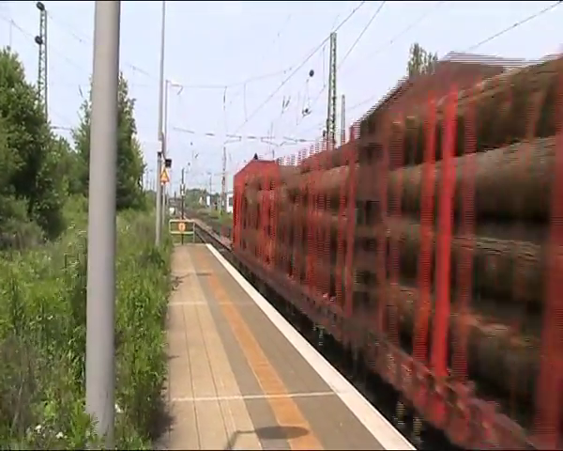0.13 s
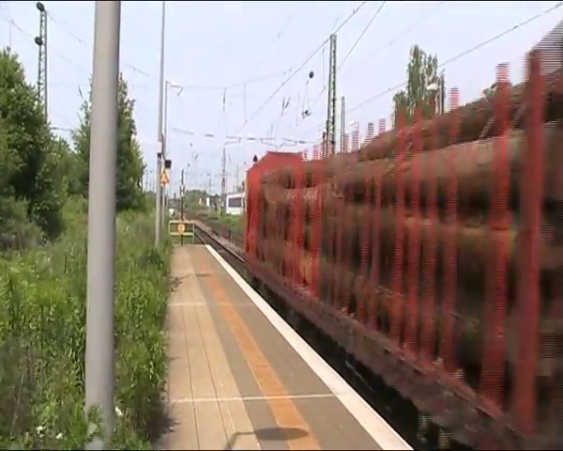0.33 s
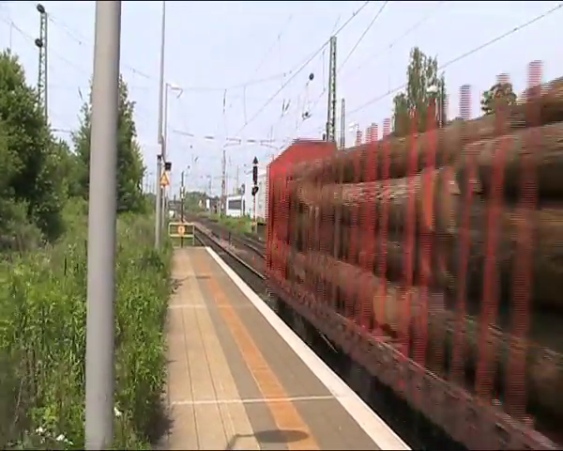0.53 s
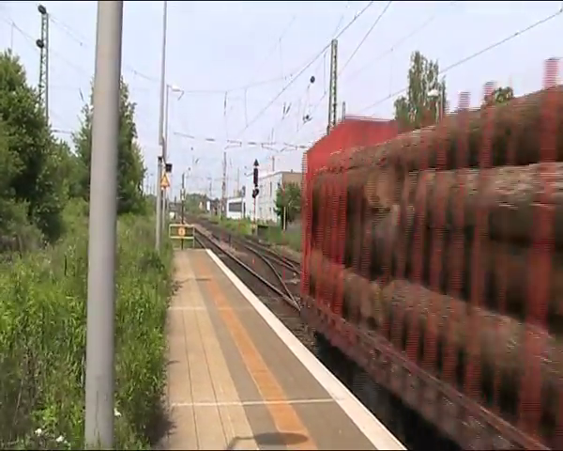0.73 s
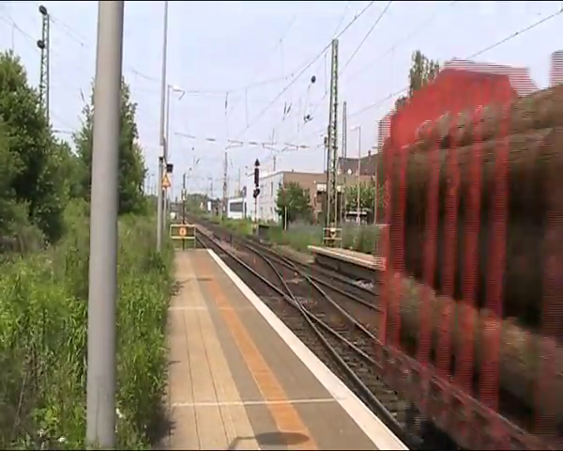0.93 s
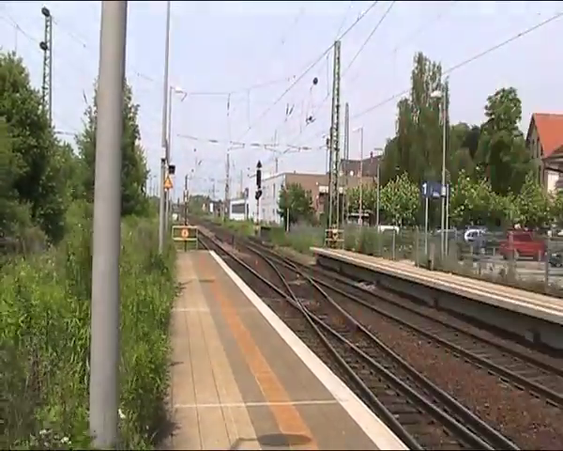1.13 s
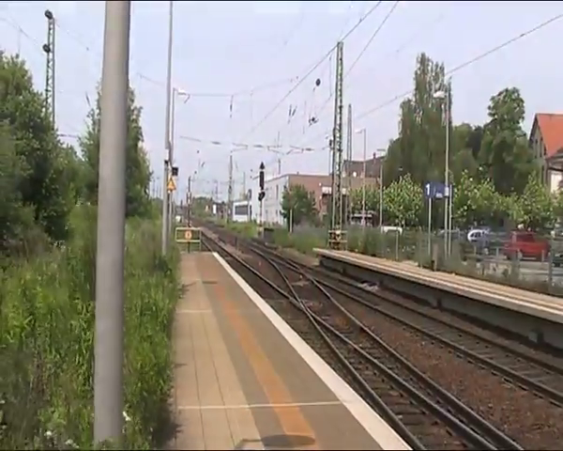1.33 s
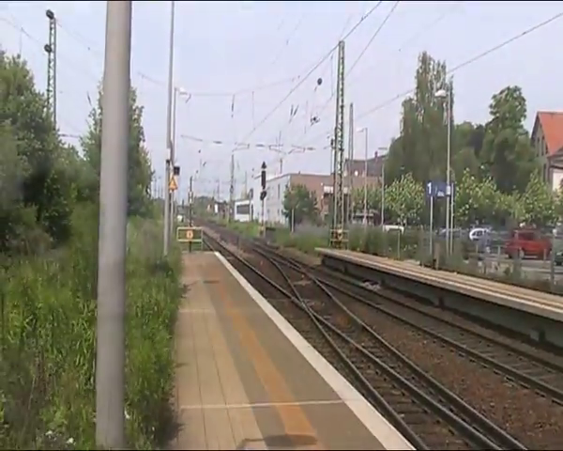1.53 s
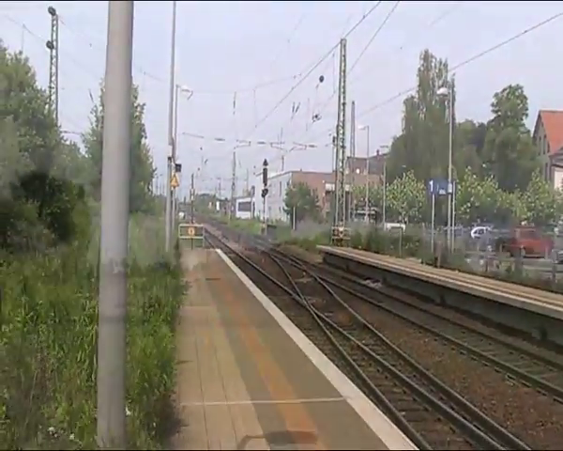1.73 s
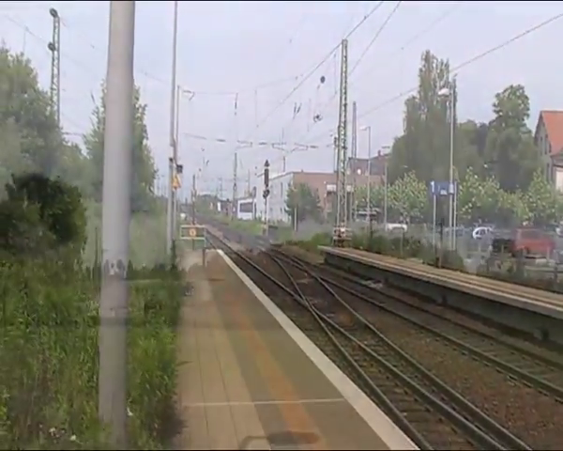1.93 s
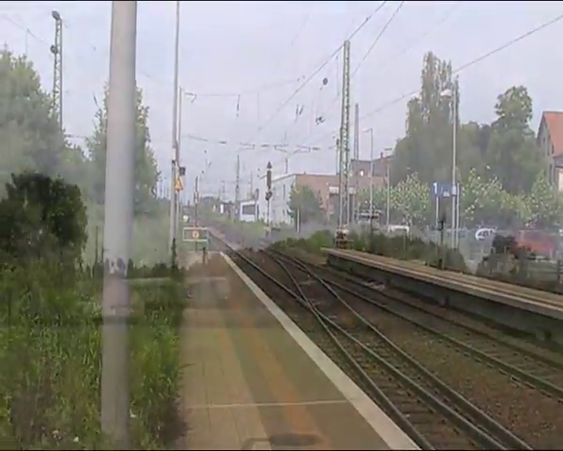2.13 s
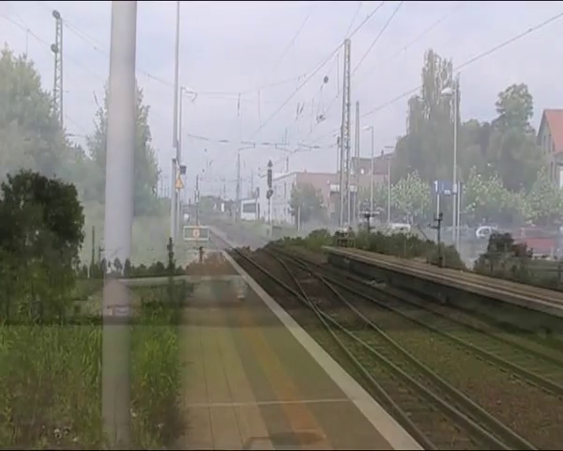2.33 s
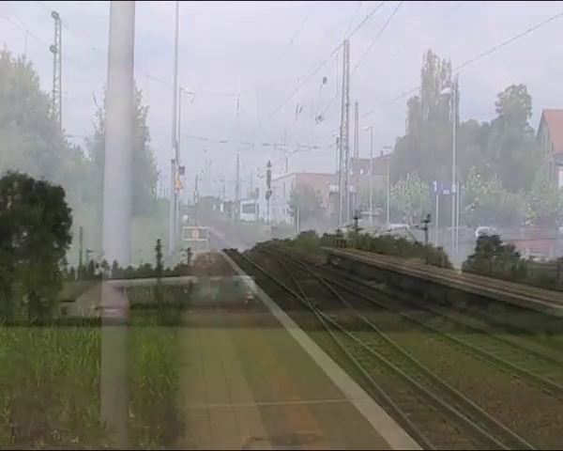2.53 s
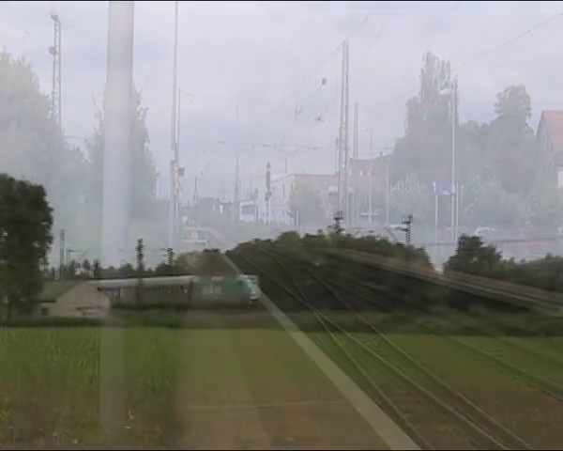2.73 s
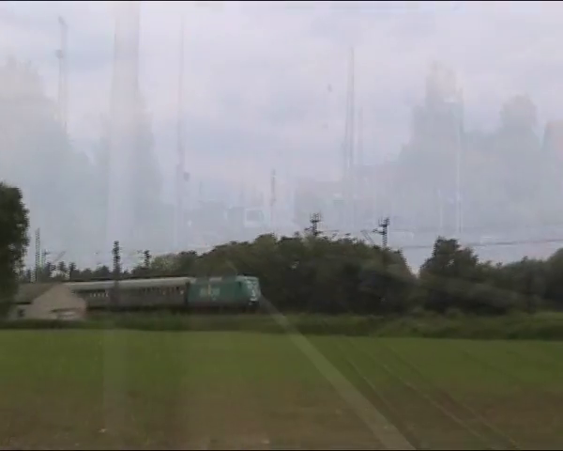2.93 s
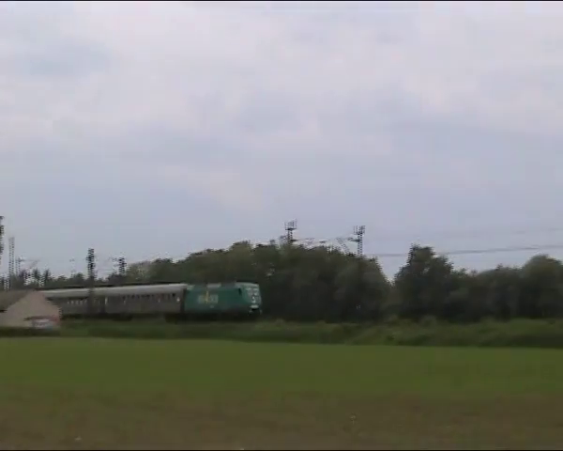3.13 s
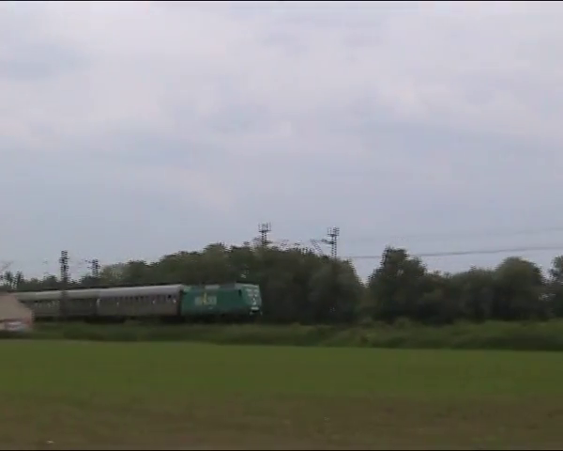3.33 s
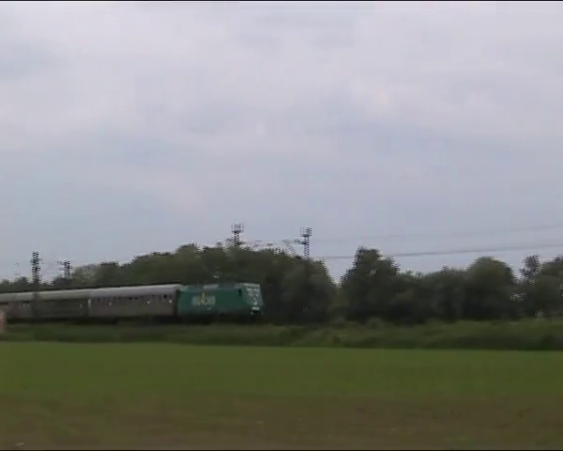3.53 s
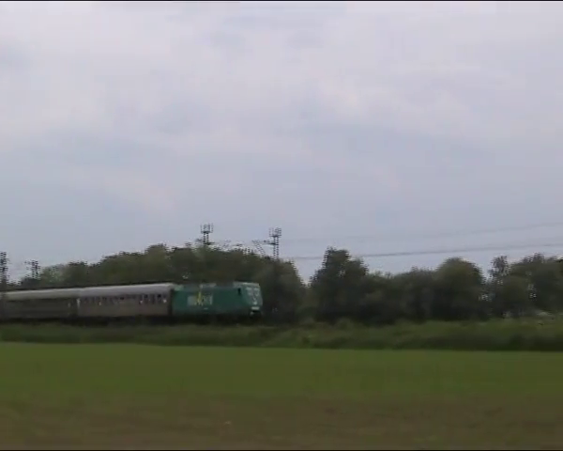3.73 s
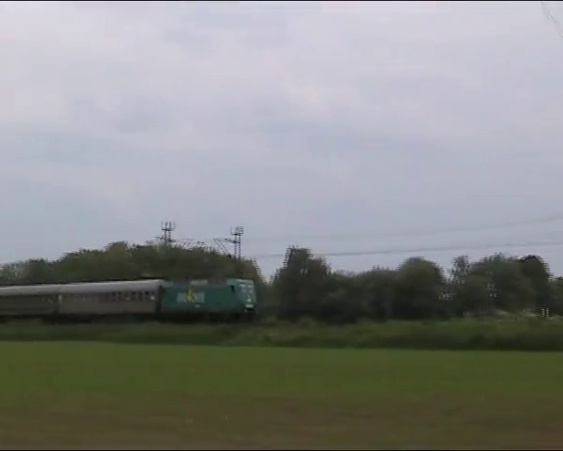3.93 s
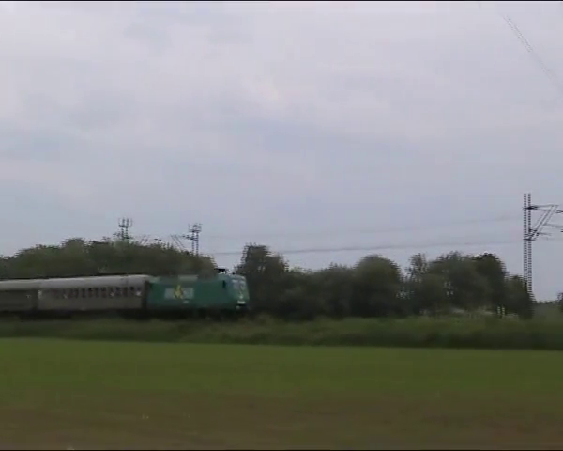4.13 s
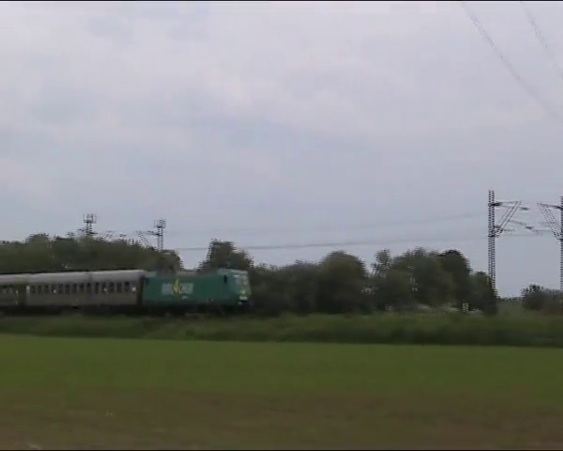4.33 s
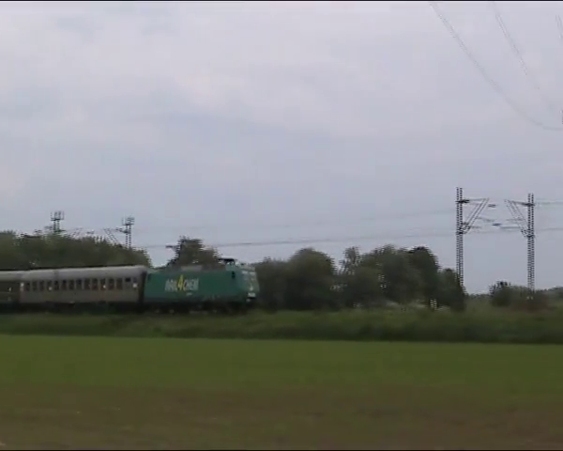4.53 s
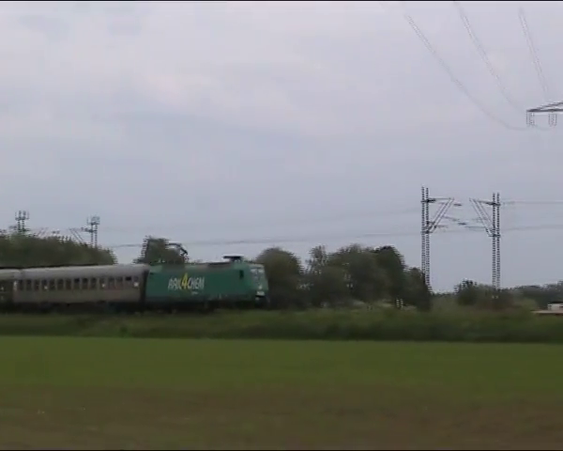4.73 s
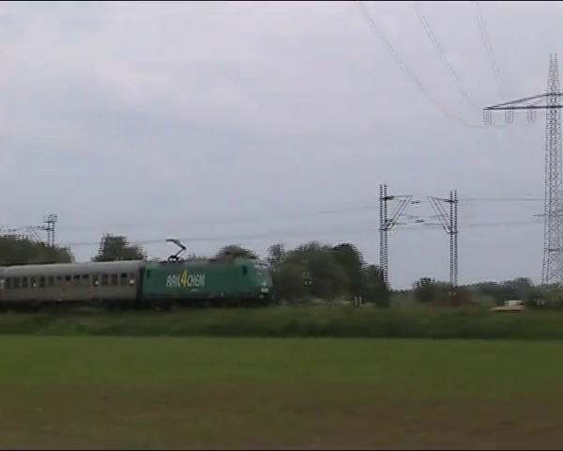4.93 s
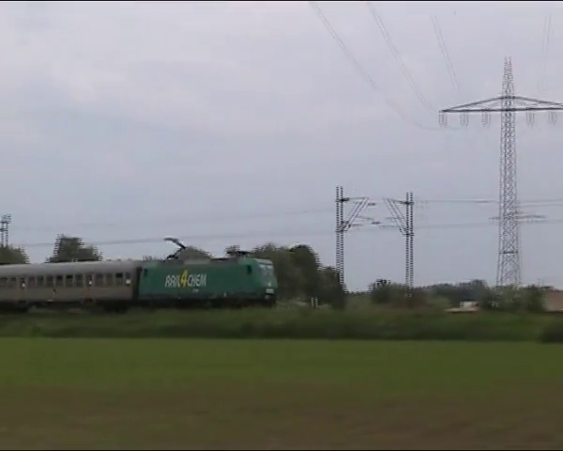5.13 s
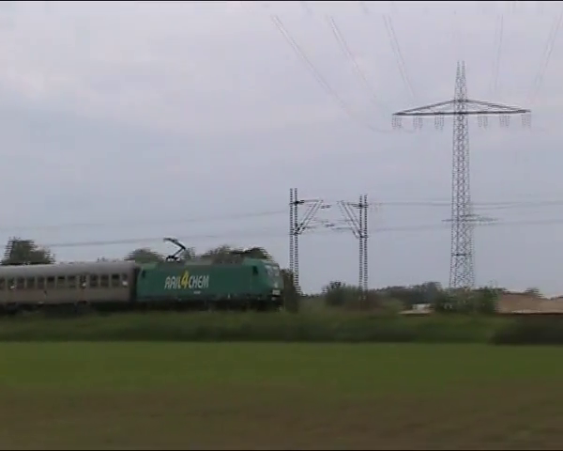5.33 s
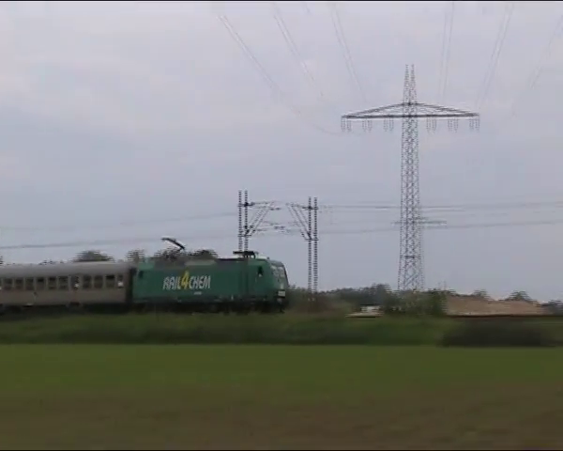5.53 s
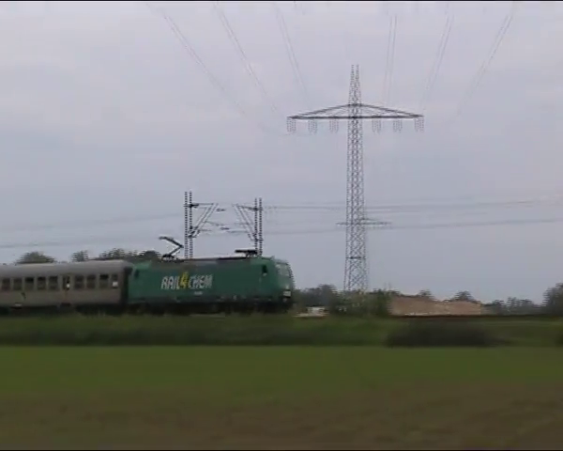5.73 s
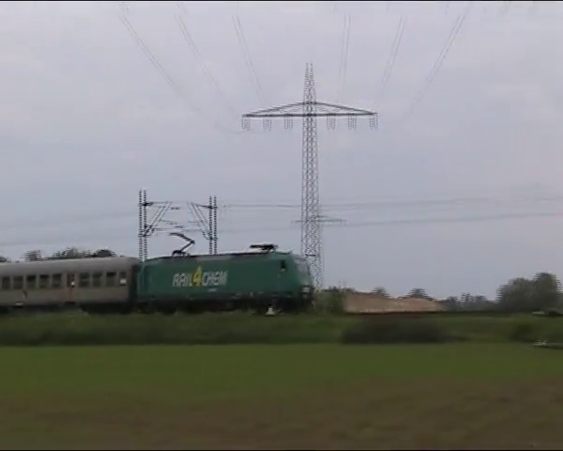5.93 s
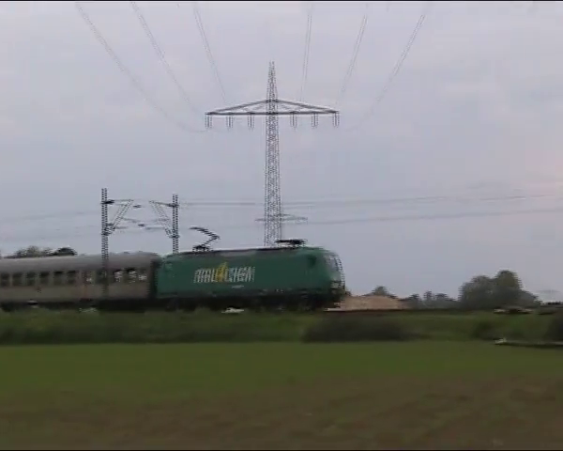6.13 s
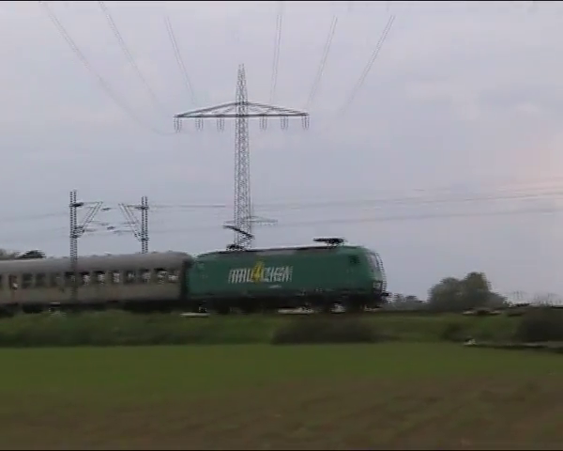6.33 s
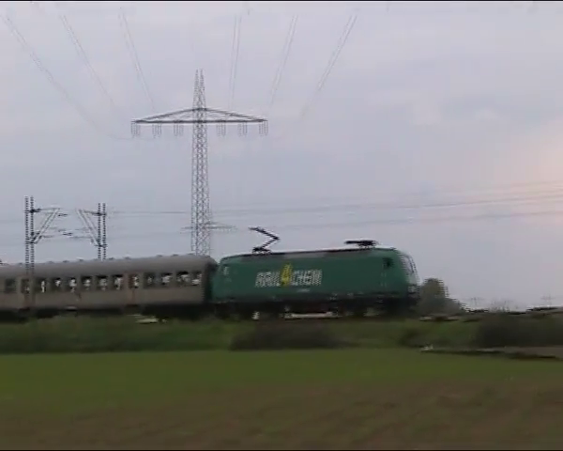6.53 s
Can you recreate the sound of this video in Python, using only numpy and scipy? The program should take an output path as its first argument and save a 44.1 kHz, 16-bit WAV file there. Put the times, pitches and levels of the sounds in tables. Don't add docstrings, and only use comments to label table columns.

```python
import sys
import numpy as np
from scipy import signal
from scipy.fft import rfft, irfft
from scipy.io import wavfile

SR = 44100
rng = np.random.default_rng(int(sys.argv[2]) if len(sys.argv) > 2 else 0)


def voltage_ratio(level):
    return 10 ** (np.asarray(level, float) / 20)


def master(y):
    cut = np.clip(np.atleast_2d(y).T, -1, 1)
    pcm = np.round(cut * 32767)
    wavfile.write(sys.argv[1], SR, pcm.astype(np.int16))


N = 290178
TIME, HZ = np.arange(N) / SR, np.fft.rfftfreq(N, 1 / SR) + 1e-3
FIELD_IN, FIELD_FULL, PLATFORM_GONE = 1.287, 2.7, 3.2863


def freight():
    pair = freight_at_ports()
    # frequency in Hz, level in dB per Hz.
    freight_colour = [(15, -54), (25, -18.5), (70, -0.5), (275, -5), (570, -3), (854, -3), (1630, -14),
                      (1770, -14), (2140, -16), (3200, -19.5), (4670, -27.5), (7580, -30), (14100, -42.5),
                      (15700, -47.5)]
    # frequency in Hz, width in Hz, height above the roar in dB.
    freight_rings = [(445, 59, 0.5), (560, 170, -0.5), (676, 45, -2), (870, 37, -1.5), (1690, 125, -1)]
    colour = ringing(freight_colour, freight_rings, 318, 937)
    out = freight_rolling(pair * colour, freight_rings) + brake_squeal(pair) + rail_joints(pair, colour)
    return out * np.clip((PLATFORM_GONE - TIME) / (PLATFORM_GONE - FIELD_FULL), 0, 1)


def freight_at_ports():
    # frequency in Hz, likeness 0-1, lead of the left in radians,
    # left minus right in dB.
    freight_ports = [(60, .3, 0, 0), (180, .45, 0, -1), (350, .95, -.1, 0), (650, .96, -.25, -.5),
                     (1300, .94, -.55, -1.5), (2300, .9, -.9, -2.5), (4500, .82, -1.2, -4),
                     (8000, .75, -1.1, -1), (15000, .75, -2.4, -1)]
    like, lead, pan_db = along(freight_ports)
    direct = np.sqrt(like) * noise()
    ports = []
    for side in (1, -1):
        port = direct * np.exp(.5j * side * lead) + np.sqrt(1 - like) * noise()
        ports.append(port * voltage_ratio(side * pan_db / 2))
    return np.array(ports)


def freight_rolling(pair, rings):
    # time in seconds, rail roar in dB.
    roar_levels = [
        (0, -20),
        (.3, -17),
        (.6, -18.5),
        (.85, -18.5),
        (1.1, -17),
        (1.3, -19),
        (1.55, -21.5),
        (1.93, -25),
        (2.2, -30),
        (2.7, -35.5),
    ]
    # time in seconds, swell in dB, length in seconds, extra brightness in dB,
    # extra clang in dB.
    bogies = [(.07, 1, 0.16, 3, 1), (0.336, 3.5, .14, 1.5, 3.5), (0.446, 5.5, 0.1, 0.5, 1),
              (0.58, 6, 0.071, -4, -1), (.7, 4.5, 0.17, 2, -1), (1.035, 3.5, 0.043, 0.5, -3.5),
              (1.144, 3, 0.09, -1.5, 1), (1.268, 9.5, 0.082, -1, -1), (1.406, 6.5, .08, -5.5, -2),
              (1.68, 5, 0.11, -2.5, -3.5), (1.833, -2.5, 0.046, 0, 1.5), (1.974, 2, 0.085, 5.5, 0),
              (2.466, 2.5, 0.099, 1, 1.5)]
    roar = curves(roar_levels)[0]
    swell = sum(db * bell(s, length) for s, db, length, _, _ in bogies)
    bogie_bright = sum(db * bell(s, length) for s, _, length, db, _ in bogies)
    bogie_clang = sum(db * bell(s, length) for s, _, length, _, db in bogies)

    def layer(alongside_db, per_receding_db, per_swell_db):
        return alongside_db + per_receding_db * (roar + 18) + per_swell_db * swell - roar

    clang = layer(-31.5, 0.53, 0.7) + bogie_clang
    hiss = layer(-36.5, 0.89, 0.94)
    rumble = layer(-17.5, 0.63, -.2)
    air_db = 1 - 4 * TIME + 0.38 * swell + bogie_bright

    def band_db(hz):
        level = roar + (1 - fade(hz, 220, 500)) * (rumble - 3)
        level = level + (fade(hz, 700, 1300) - fade(hz, 1700, 3740)) * (clang + 9)
        level = level + fade(hz, 2300, 3500) * (hiss + 16)
        return level + fade(hz, 5600, 12000) * (air_db + 0.31 * (hiss + roar + 33))

    return rolling(pair, band_db, 1.1, 1.0) + singing(pair, rings, roar - 6, 0.98)


def brake_squeal(pair):
    # time in seconds, lower ring in dB, upper ring in dB, length in seconds.
    squeal = [
        (0.068, -72, -57.5, 0.091),
        (.3, -68, -60, .2),
        (.66, -51, -55, 0.081),
        (.8, -56.5, -63, .12),
        (.92, -50, -52.5, .11),
        (1.07, -60, -62, .1),
        (1.22, -65, -55, .1),
        (1.36, -58, -51.5, .12),
        (1.49, -60, -61, 0.064),
    ]
    # frequency in Hz, width in Hz.
    squeal_rings = [(10250, 250), (13850, 450)]
    out = np.zeros((2, N))
    for ring, (hz, width) in enumerate(squeal_rings):
        rub = np.sqrt(sum(voltage_ratio(2 * spell[1 + ring]) * bell(spell[0], spell[3]) for spell in squeal))
        mode = unit(resonance(hz, width), 0, SR)
        out += irfft(pair * mode, N) * rub * voltage_ratio(1.8 * walk(6.9))
    return out


def rail_joints(pair, colour):
    # time in seconds, level in dB, decay in seconds.
    joints = [
        (.395, -35, .04),
        (.59, -40.5, 0.036),
        (.624, -22, .02),
        (1.042, -24.5, 0.024),
        (1.222, -27.5, 0.075),
        (1.413, -21, 0.018),
        (1.619, -35.5, .04),
        (1.68, -34, 0.029),
        (1.94, -32, 0.073),
    ]
    blows = np.zeros(N)
    for s, db, decay in joints:
        add(blows, s, voltage_ratio(db) * np.exp(-7 * TIME[:8000] / decay))
    crack = unit(colour * fade(HZ, 300, 3000) / (1 + (HZ / 9000) ** 4), 1000, 9000)
    return blows * irfft(pair * crack, N)


def far_train():
    # time in seconds, wheel rush in dB.
    rush_levels = [(2.0, -34), (2.4, -32), (2.9, -28), (3.1, -21.5), (3.42, -22.5), (3.7, -21.5),
                   (3.85, -22.5), (4.1, -20.5), (4.52, -21), (4.66, -18.5), (5.2, -16.5), (5.58, -15),
                   (5.98, -18.5), (6.15, -15), (6.32, -18.5), (6.58, -15.5)]
    # frequency in Hz, level in dB per Hz.
    far_colour = [(15, -49), (25, -24), (102, -11.5), (247, -23.5), (275, -29), (413, -21), (602, -11.5),
                  (809, -11), (901, -5.5), (1250, -6.5), (1820, -3.5), (3970, -30.5), (5490, -31.5),
                  (8680, -48.5), (15700, -85)]
    # frequency in Hz, width in Hz, height above the rush in dB.
    far_rings = [
        (879, 65, 5),
        (980, 113, 4.5),
        (1235, 93, 3),
        (1590, 42, -2),
        (1640, 34, -5),
        (1883, 25, -6.5),
        (2070, 92, -7),
        (3430, 1500, 4),
        (3720, 350, -1.5),
        (4200, 50, 4.5),
    ]
    # frequency in Hz, side minus mid in dB.
    far_side = [(60, -17.5), (110, -28), (200, -13), (380, -21), (700, -32.5), (1290, -21), (2380, -11),
                (4400, -9), (8120, -11), (15000, 8.5)]
    # time in seconds, side in dB.
    far_width = [
        (1.3, 11),
        (3.0, -11),
        (3.6, -7),
        (4.1, -4),
        (4.5, 0.5),
        (5.6, 2.5),
        (6.58, 4.5),
    ]
    # time in seconds, swell in dB, length in seconds.
    rail_swells = [(2.3, 13.5, 0.45), (2.92, -1, 0.12), (3.15, 0.5, .12), (3.447, -6, .05),
                   (3.566, 2.5, 0.03), (3.874, 1.5, 0.22), (4.346, 5, 0.42), (4.818, 7, 0.37),
                   (5.246, 3, 0.67), (5.718, 6, .05), (5.957, 5.5, 0.23), (6.387, 6.5, 0.21)]
    # time in seconds, surge in dB, length in seconds.
    surges = [(3.155, 1.5, 0.033), (3.47, 5.5, 0.018), (3.55, 3.5, 0.018), (3.748, 2.5, 0.042),
              (4.017, 1.5, 0.055), (4.287, 1, 0.032), (4.666, 1, 0.018), (4.786, 1.5, 0.021),
              (5.57, 1.5, .03), (5.98, -1.5, .02), (6.257, -1.5, 0.018)]

    approach = curves(rush_levels)[0]
    nearer = approach + 20
    swell = sum(db * bell(s, length) for s, db, length in rail_swells)
    clear_db = 2.3 * bell(4.87, 0.59)
    rush = approach + sum(db * bell(s, length) for s, db, length in surges)
    rail = -30 + 0.96 * nearer - approach + swell
    hiss = -45.5 + 0.64 * nearer + 0.42 * clear_db - rush
    sleepers = -19.5 + 0.43 * nearer - rush
    air_db = 0.5 - 0.3 * np.minimum(nearer, 0) + 2.6 * (TIME - 4.5) + .3 * swell + .6 * clear_db

    def band_db(hz):
        level = rush + (fade(hz, 100, 250) - fade(hz, 720, 950)) * sleepers
        level = level + (fade(hz, 580, 950) - fade(hz, 1000, 1400)) * (rail + 4)
        return level + fade(hz, 1800, 4500) * (hiss + 24) + fade(hz, 4500, 10000) * air_db

    colour = ringing(far_colour, far_rings, 1002, 2240)
    pair = colour * np.array([noise(), noise() * voltage_ratio(along(far_side)[0])])
    mid, side = rolling(pair, band_db, 0.92, 0.31) + singing(pair, far_rings[2:6], rush - 7, 2.6)
    bright = irfft(rfft(side) * fade(HZ, 1200, 3000), N)
    width_db = curves(far_width)[0]
    side = (side - bright) * voltage_ratio(width_db) + bright * voltage_ratio(.4 * width_db)
    rise = np.clip((TIME - FIELD_IN) / (FIELD_FULL - FIELD_IN), 0, 1) ** 3.0
    return np.array([mid + side, mid - side]) * rise


def wind():
    # time in seconds, level in dB, brightness in dB.
    puffs = [(.077, -22.5, -12), (.187, -20.5, -7), (.296, -28, -22), (.45, -28, 0), (.604, -27, -3),
             (.702, -31, -6), (.85, -26, 8), (.885, -29, 5), (1.06, -27, -19), (1.15, -29, -13),
             (1.36, -20, 1), (1.398, -26, 6), (1.46, -32, -7), (1.578, -24, 2), (1.771, -28, 3),
             (1.822, -27.5, -13), (1.897, -38, -15), (2.072, -29, -19), (2.131, -30, -17), (2.192, -26, -9),
             (2.36, -33, -14), (2.54, -27, -2), (2.607, -30, -6), (2.691, -31, -10), (2.867, -37.5, -8)]
    # time in seconds, level in dB, brightness in dB, length in seconds.
    gusts = [(4.173, -46, 4, 0.071), (4.294, -42, -5, .032), (4.498, -42.5, -15, 0.09),
             (4.361, -31, 3, 0.015), (4.426, -45, 12, .024), (5.863, -28.5, 4, 0.019),
             (5.893, -27, -7, .021), (5.917, -33, -2, .018), (5.97, -35, -17, 0.034),
             (6.064, -31, -22, 0.017), (6.113, -30, -1, .022), (6.148, -24, -8.5, 0.069),
             (6.19, -32, -2, .03), (6.232, -30, -17, 0.033), (6.285, -25.5, -10, 0.028),
             (6.02, -42, 5, .03), (6.341, -36.5, -14, 0.027), (6.44, -40, -12, .05)]
    puff_s = 0.036
    low, high = np.zeros(N), np.zeros(N)
    for s, db, bright_db, length in [(*puff, puff_s) for puff in puffs] + gusts:
        burst = voltage_ratio(db) * bell(s, length)
        low += burst ** 2 / (1 + voltage_ratio(2 * bright_db))
        high += burst ** 2 / (1 + voltage_ratio(-2 * bright_db))
    thud = unit(HZ ** 2 / (HZ ** 2 + 55 ** 2) / (1 + (HZ / 200) ** 4), 70, 250)
    rasp = unit(HZ ** 4 / (HZ ** 4 + 240 ** 4) / (1 + (HZ / 520) ** 4), 270, 510)
    left, right = (np.sqrt(low) * irfft(noise() * thud, N) + np.sqrt(high) * irfft(noise() * rasp, N)
                   for _ in range(2))
    push = 0.2 * (left - right)
    return voltage_ratio(3.0) * np.array([left + push, right - push])


def body_knocks():
    # time in seconds, level in dB, pitch in Hz, decay in seconds.
    knocks = [(1.945, -23.5, 285, 0.037), (2.185, -30.5, 285, 0.048), (4.26, -34, 580, 0.05),
              (4.349, -33, 276, 0.017), (4.351, -28, 162, 0.016), (5.855, -29.5, 288, 0.049),
              (5.896, -34.5, 137, 0.058), (6.125, -25, 113, 0.057), (6.29, -25, 707, 0.035),
              (6.295, -34, 512, 0.054), (6.382, -26.5, 510, 0.044)]
    out, t = np.zeros((2, N)), TIME[:6000]
    for s, db, hz, decay in knocks:
        envelope = (1 - np.exp(-t / 0.0026)) * np.exp(-7 * t / decay / 2)
        add(out, s, voltage_ratio(db + 13.5) * envelope * np.sin(2 * np.pi * hz * t))
    return out


def housing_ticks():
    # time in seconds, level in dB.
    ticks = [
        (3.82, -65.5),
        (3.89, -66.5),
        (4.92, -70),
        (4.981, -68.5),
        (6.26, -68),
        (6.352, -60),
        (6.395, -67),
        (6.416, -64),
    ]
    out = np.zeros((2, N))
    for s, db in ticks:
        add(out, s - .006, voltage_ratio(db) * np.hanning(520) * np.diff(rng.standard_normal((2, 521))))
    return out


def bird():
    # time in seconds, level in dB, pitch in Hz, length in seconds.
    chirps = [
        (3.203, -43, 5180, .012),
        (3.278, -51, 5230, .01),
        (3.35, -48, 5230, .012),
        (3.495, -48, 5250, .02),
        (3.577, -40, 5220, .015),
    ]
    out, t = np.zeros((2, N)), TIME[:6000]
    for s, db, hz, length in chirps:
        envelope = np.exp(-2 * ((t - .03) / length) ** 2)
        add(out, s - .03, voltage_ratio(db + 2.5) * envelope * np.sin(2 * np.pi * hz * t))
    return out


def rolling(pair, band_db, shared_db, own_db):
    out, near = np.zeros((2, N)), walk(3.1)
    for hz in 22 * 2 ** np.arange(0, 10, .5):
        slot = np.cos(np.pi * np.clip(np.log2(HZ / hz), -.5, .5)) ** 2
        near = 0.29 * near + 0.32 * walk(9)
        out += irfft(pair * slot, N) * voltage_ratio(band_db(hz) + shared_db * near + own_db * walk(17))
    return out


def singing(pair, rings, db, swing_db):
    out = np.zeros((2, N))
    for hz, width, ring_db in rings:
        out += irfft(pair * resonance(hz, width), N) * voltage_ratio(db + ring_db + swing_db * walk(5))
    return out


def ringing(colour, rings, lo_hz, hi_hz):
    modes_db = sum(db * resonance(hz, width) for hz, width, db in rings)
    return unit(voltage_ratio(along(colour)[0] + modes_db), lo_hz, hi_hz)


def resonance(hz, width):
    return 1 / (1 + (2 * (HZ - hz) / width) ** 2)


def along(table):
    f, *columns = np.transpose(table)
    return [np.interp(np.log(HZ), np.log(f), c) for c in columns]


def curves(table):
    s, *columns = np.transpose(table)
    return [np.interp(TIME, s, c) for c in columns]


def walk(rate_hz):
    steps = rng.standard_normal(400)
    phase = TIME * rate_hz
    k = phase.astype(int)
    ease = .5 - .5 * np.cos(np.pi * (phase - k))
    return steps[k % 399] * (1 - ease) + steps[k % 399 + 1] * ease


def noise():
    return rfft(rng.standard_normal(N))


def unit(gain, lo_hz, hi_hz):
    inside = gain[(HZ > lo_hz) & (HZ < hi_hz)]
    return gain / np.sqrt(np.sum(inside ** 2) / len(HZ))


def fade(hz, lo_hz, hi_hz):
    return np.clip(np.log(hz / lo_hz) / np.log(hi_hz / lo_hz), 0, 1)


def bell(s, length):
    return np.exp(-2 * ((TIME - s) / length) ** 2)


def add(out, s, sound):
    i = int(s * SR)
    out[..., i:i + sound.shape[-1]] += sound[..., :N - i]


def scene():
    return freight() + far_train() + wind() + body_knocks() + housing_ticks() + bird()


def low_pass(x):
    return signal.sosfilt(signal.butter(12, 15760, fs=SR, output="sos"), x)


def record(dry):
    hiss_db, click_db = -70, -18
    drop_start, drop_end = 1.25815, 1.2862
    x = dry + voltage_ratio(hiss_db) * np.diff(rng.standard_normal((2, N + 1)))
    x = np.tanh(0.58 * x) / 0.61
    closing, opening = (drop_start - TIME) / 0.00049, (TIME - drop_end) / 0.0011
    x = x * np.clip(np.maximum(closing, opening), 0, 1)
    add(x, PLATFORM_GONE - 3 / SR, voltage_ratio(click_db) * np.array([.3, 0.77, .9, -.2, -.5]))
    return low_pass(x)


dry = scene()
out = record(dry)
master(out)
```